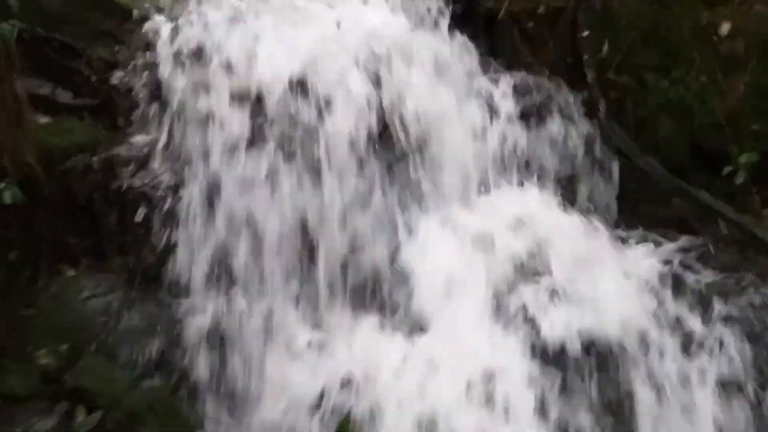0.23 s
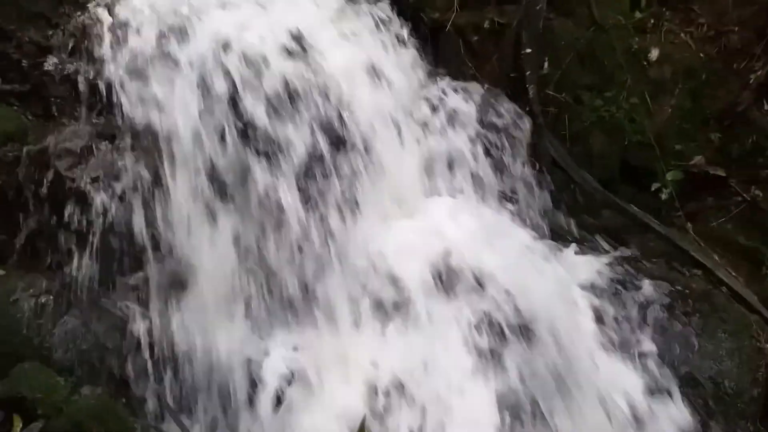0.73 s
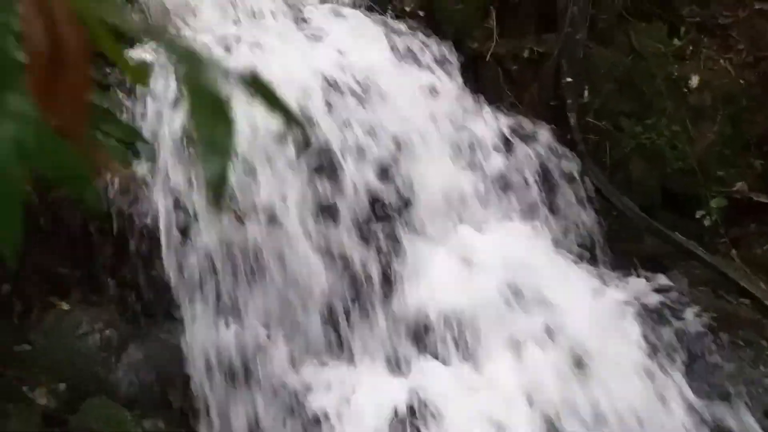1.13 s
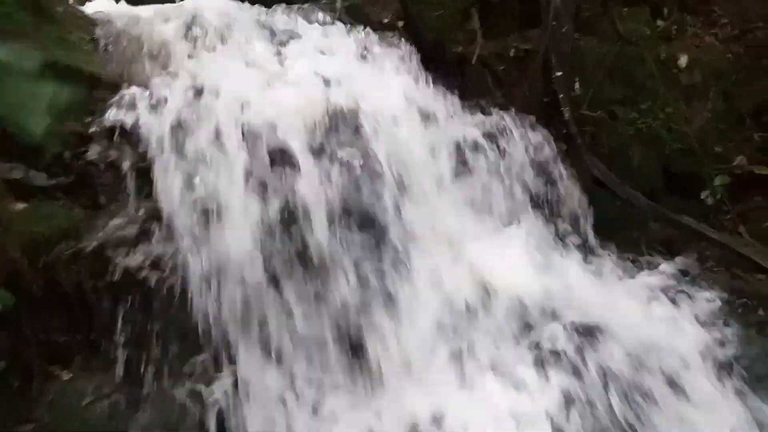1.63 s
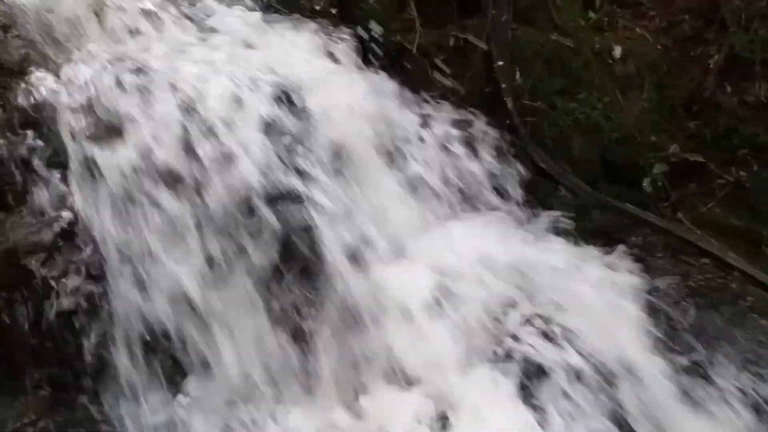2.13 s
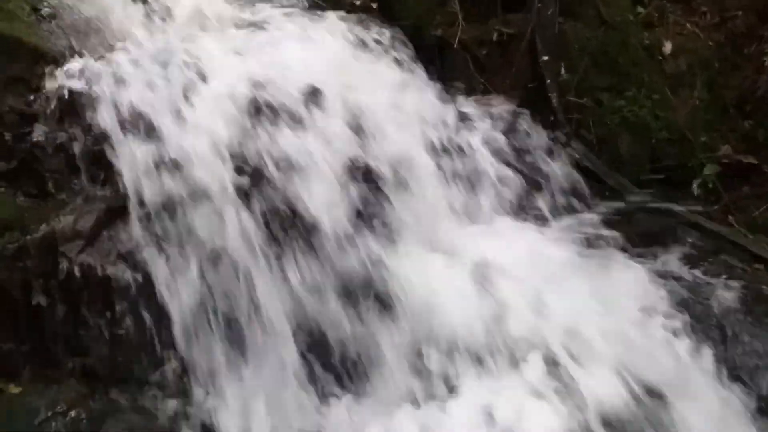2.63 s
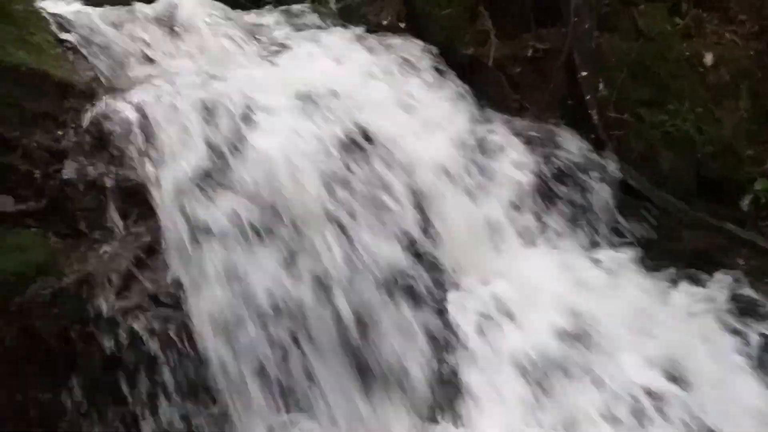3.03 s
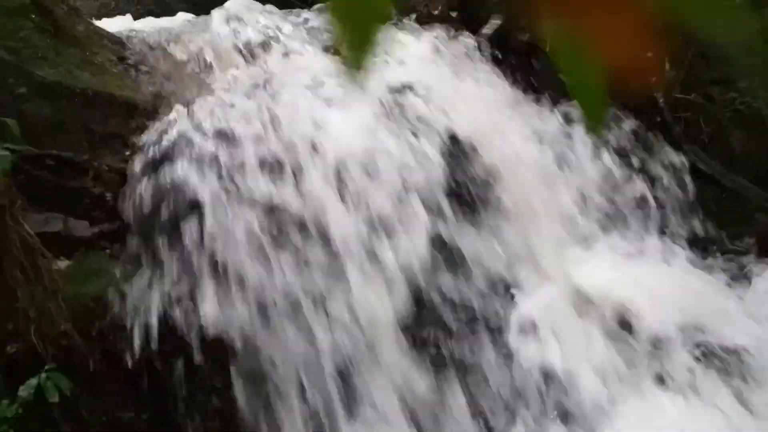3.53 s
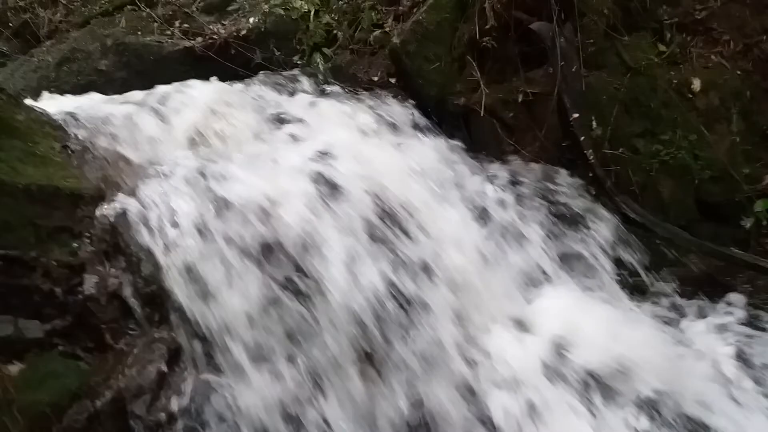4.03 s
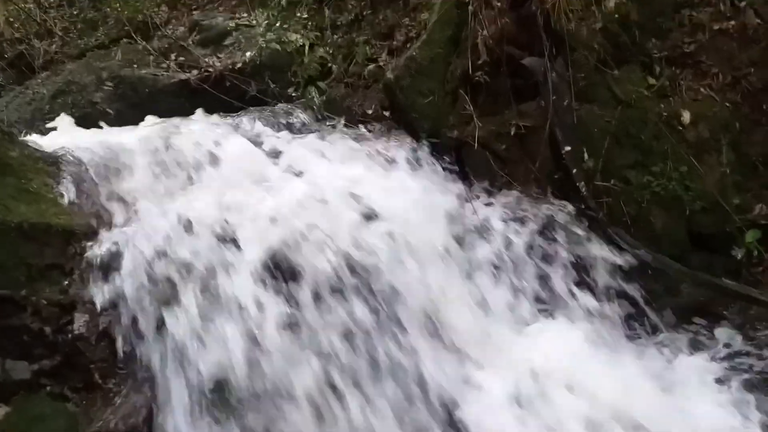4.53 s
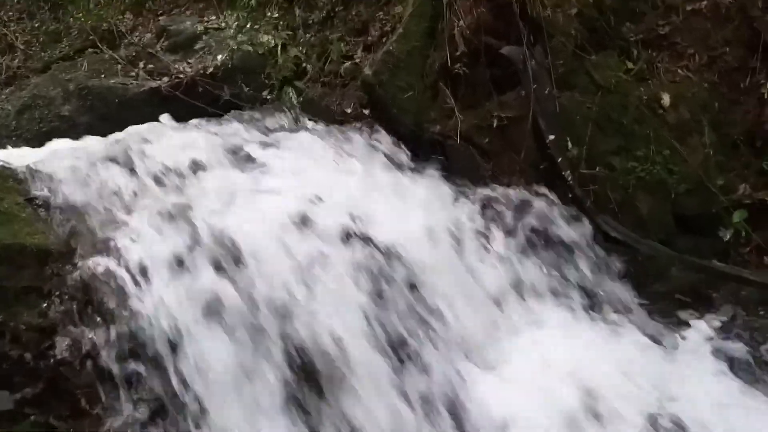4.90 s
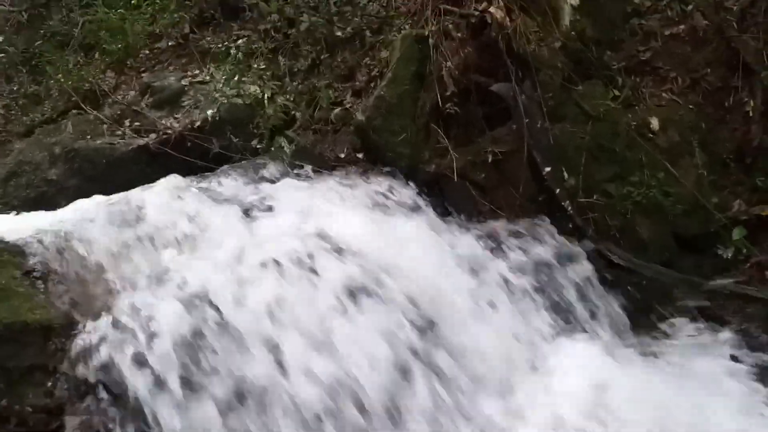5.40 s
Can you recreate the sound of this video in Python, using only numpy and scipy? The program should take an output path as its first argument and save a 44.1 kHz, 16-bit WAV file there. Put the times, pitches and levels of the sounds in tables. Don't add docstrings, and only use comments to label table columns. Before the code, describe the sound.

Continuous close rush of white water, already running at the start and cut off still flowing. The sound is broad and noisy, strongest around two kilohertz, with grainy bubbling, fine spray and light deep bass. Tiny surges and very brief thinnings ripple through it; one sharp drop click stands out near four seconds. Small two-port microphone, narrow stereo, open forest, no audible echo.

```python
import sys
import numpy as np
from scipy import signal
from scipy.fft import rfft, irfft, next_fast_len
from scipy.io import wavfile

SR = 44100
rng = np.random.default_rng(int(sys.argv[2]) if len(sys.argv) > 2 else 0)


def voltage_ratio(decibels):
    exponent = np.asarray(decibels, float) / 20
    return 10 ** exponent


def unload_wav(signal):
    wavfile.write(
        sys.argv[1],
        SR,
        np.round(np.clip(np.atleast_2d(signal).T, -1, 1) * 32767).astype(np.int16),
    )


N = 249606


def rush(source, patchy_db, surge_db):
    flow_db = flow()
    size = next_fast_len(N)
    hz = np.maximum(np.fft.rfftfreq(size, 1 / SR), 1)
    water = rfft(source, size) * voltage_ratio(colour(hz))
    part_hz, moves = part_moves(flow_db)
    lull, plunge = lulls(), plunges()
    out, surge, neighbours = 0, drift(21), drift(9)
    for centre in 22 * 2 ** np.arange(0, 10, .5):
        octaves = np.clip(np.log2(hz / centre), -.5, .5)
        share = np.cos(np.pi * octaves) ** 2
        place = np.interp(np.log(centre), np.log(part_hz), range(len(part_hz)))
        level = sum(max(0, 1 - abs(place - k)) * move for k, move in enumerate(moves))
        level = level + plunge / (1 + (centre / 160) ** 4)
        level = level + lull * (600 < centre < 9000)
        neighbours = 0.49 * neighbours + 0.89 * drift(14)
        alone = 0.65 * drift(30)
        level = level + surge_db * surge + patchy_db * (neighbours + alone)
        out = out + voltage_ratio(level) * irfft(water * share, size)[:N]
    rush_above_flow_db = 3
    return voltage_ratio(np.mean(flow_db) + rush_above_flow_db) * rms_one(out)


# time in seconds, level in dB.
FLOW = [(0, -19), (.4, -19), (.75, -19), (1.0, -17), (1.35, -16.8), (1.7, -17.5), (1.95, -16.5),
        (2.5, -16.5), (3.1, -16), (3.3, -16), (3.7, -16.5), (3.95, -17), (4.35, -17), (4.58, -16.5),
        (4.75, -17), (5.2, -17), (5.66, -17)]


def flow():
    s, db = np.transpose(FLOW)
    return np.interp(np.arange(N) / SR, s, db)


# frequency in Hz, density in dB per Hz.
POOL_COLOUR = [(25, -50.7), (45, -45.8), (62, -38.4), (80, -31), (100, -26.5), (118, -17.5), (135, -16),
               (170, -17), (250, -14.0), (350, -10.5), (430, -12), (600, -7.5), (750, -5.5), (1000, -6.1)]
# frequency in Hz, density in dB per Hz.
RUSH_COLOUR = [(1000, -5.5), (1400, -3), (1680, -0.5), (1930, 1.24), (2200, -2), (2650, -5.5), (3450, -3.5),
               (3950, -7), (4600, -5), (5900, -7), (7350, -4), (8500, -6.5), (9000, -10), (9900, -17.3)]
# frequency in Hz, density in dB per Hz.
MIST_COLOUR = [(9900, -17.5), (10500, -17), (11400, -16), (12100, -12), (12700, -12), (13300, -11.5),
               (14500, -13), (15600, -13.5)]


def colour(hz):
    points = np.array(list(POOL_COLOUR[:-1]) + list(RUSH_COLOUR[:-1]) + list(MIST_COLOUR))
    return np.interp(np.log(hz), np.log(points[:, 0]), points[:, 1])


# time in seconds, swell in dB, length in seconds.
SURGES = [(0.40, .6, 0.083), (0.84, 1, 0.061), (1.05, 3, 0.042), (1.65, .5, 0.16), (1.99, 1.5, 0.078),
          (2.2, 1.2, .05), (2.83, 1, .07), (3.04, 0.8, .05), (3.34, .5, .04), (4.1, 0, 0.22),
          (4.72, -0.4, .06), (5.14, -0.3, .06), (5.56, 1.6, .08)]
# frequency in Hz, share of the flow's swing, share of a surge,
# gain as the lip draws near in dB per second, own slosh in dB.
PARTS = [
    (125, .8, .1, 0.0, 0.2),
    (300, .8, 0.65, 0.0, 0.3),
    (1400, 0.81, 0.96, 0.0, -0.1),
    (5000, 1.0, 0.1, 0.0, 0.33),
    (12000, 0.67, .1, 0.24, 0.06),
]


def part_moves(flow_db):
    flow_swing = flow_db - flow_db.mean()
    landing = swells(SURGES)
    from_middle = (np.arange(N) - N / 2) / SR
    moves = []
    for _, follows, lands, nears_db, slosh_db in PARTS:
        slosh = slosh_db * drift(2.7)
        move = follows * flow_swing + lands * landing + nears_db * from_middle + slosh
        moves.append(move - move.mean())
    return [part[0] for part in PARTS], moves


# time in seconds, change in dB, length in seconds.
LULLS = [
    (0.465, -2, 0.018),
    (0.742, 1, .02),
    (2.096, -1, 0.021),
    (2.875, -2.5, 0.011),
    (4.437, -3.5, 0.022),
]


def lulls():
    return swells(LULLS)


def bubbles(per_cycle, cycles, count):
    out = 0
    for hz in np.geomspace(150, 14000, count):
        births = grains(per_cycle * hz, spread_db=4.0)
        ringing = resonance(births, hz, hz / cycles)
        out = out + rms_one(ringing) * np.sqrt(hz)
    return rms_one(out)


def drop_ticks():
    return rms_one(grains(4000, spread_db=2.0))


# time in seconds, peak in dB, pitch in Hz.
SMACKS = [
    (1.533, -10, 3200),
    (1.713, -11, 3400),
    (2.942, -13, 4400),
    (3.7960, -2, 5070),
    (4.1959, -12, 3300),
    (4.4800, -10, 3400),
    (4.7600, -9, 5500),
    (5.0745, -7, 3700),
    (5.451, -13, 3400),
]


def smacks():
    out, t = np.zeros(N), np.arange(200) / SR
    for s, peak_db, hz in SMACKS:
        burst = np.sin(2 * np.pi * hz * t) * t * np.exp(-t * hz / 1.3)
        at = round(s * SR)
        out[at:at + 200] += voltage_ratio(peak_db) * burst / np.max(np.abs(burst))
    return out


# time in seconds, swell in dB, length in seconds.
PLUNGES = [
    (.7, 2.5, .05),
    (1.87, 7, .1),
    (2.85, 3, .1),
    (3.2, 3.5, .05),
    (4.0, 3.5, .1),
    (4.75, 3.5, .07),
    (5.08, 5, .07),
    (5.4, 2, .06),
    (5.63, 5, .06),
]


def plunges():
    return swells(PLUNGES)


def swells(rows):
    t = np.arange(N) / SR
    return sum(db * np.exp(-((t - s) / length) ** 2) for s, db, length in rows)


def drift(rate):
    r = np.exp(-80 * np.pi * rate / SR)
    chance = rng.standard_normal(N // 40 + 2002)
    slow = signal.lfilter([1], [1, -2 * r, r * r], chance)[2000:]
    return np.interp(np.arange(N) / 40, np.arange(len(slow)), rms_one(slow))


def grains(per_s, spread_db):
    size_db = spread_db * np.minimum(rng.exponential(1, N), 5)
    sizes = voltage_ratio(size_db) * rng.choice([-1, 1], N)
    return sizes * (rng.random(N) < per_s / SR)


def resonance(x, hz, width_hz):
    r = np.exp(-np.pi * width_hz / SR)
    zeros = np.array([1, 0, -1]) * (1 - r * r) / 2
    poles = [1, -2 * r * np.cos(2 * np.pi * hz / SR), r * r]
    return signal.lfilter(zeros, poles, x + 1e-18)


def rms_one(x):
    return x / np.sqrt(np.mean(x ** 2) + 1e-20)


def scene():
    blur = rng.standard_normal(N)
    near = voltage_ratio(-9.5) * bubbles(per_cycle=.1, cycles=4.2, count=15)
    ticks = voltage_ratio(-14.0) * drop_ticks()
    fall = rush(blur + near + ticks, patchy_db=0.44, surge_db=0.43) + smacks()
    return np.array([fall, fall])


# frequency in Hz, width in Hz, level in dB.
PORT_MISMATCH = [
    (1890, 560, -13),
    (9800, 800, -10),
]


def ports(mid):
    side = 0
    for sign, (hz, width, db) in zip((1, -1), PORT_MISMATCH):
        edges = [hz - .95 * width, hz + .95 * width]
        close = signal.butter(2, edges, "band", fs=SR, output="sos")
        side = side + sign * voltage_ratio(db) * signal.sosfiltfilt(close, resonance(mid, hz, width))
    return np.array([mid + side, mid - side])


def band_limit(x):
    return signal.sosfilt(signal.butter(12, 15720, fs=SR, output="sos"), x)


def record(dry):
    mid = dry.mean(axis=0)
    mid = mid / (1 + (mid / .9) ** 8) ** (1 / 8)
    mid = signal.sosfilt(signal.butter(2, 22, "high", fs=SR, output="sos"), mid)
    return band_limit(ports(mid))


dry = scene()
out = record(dry)
unload_wav(out)
```